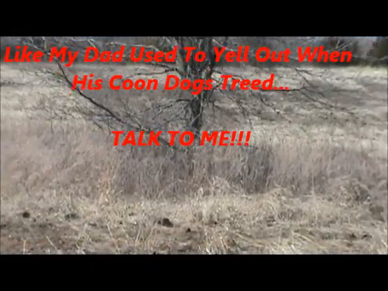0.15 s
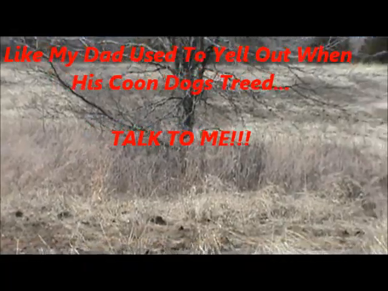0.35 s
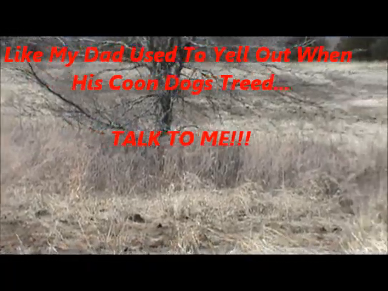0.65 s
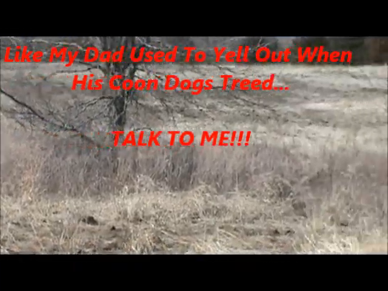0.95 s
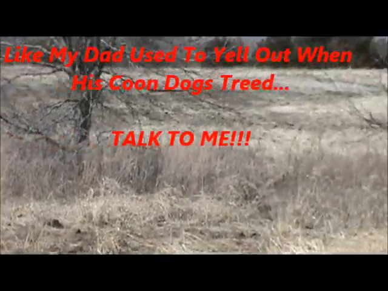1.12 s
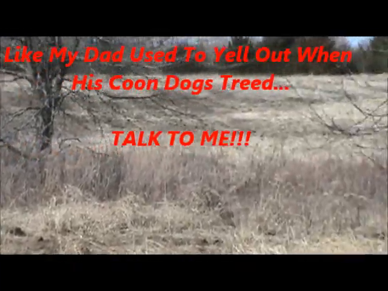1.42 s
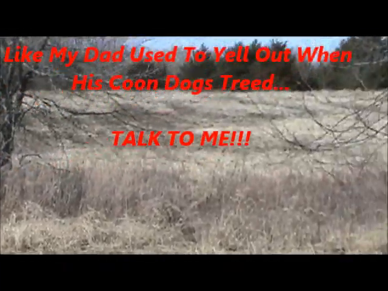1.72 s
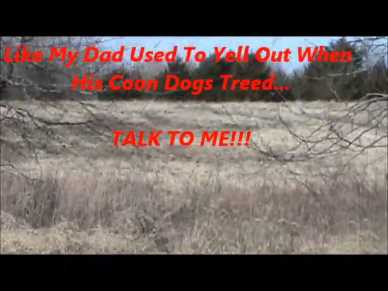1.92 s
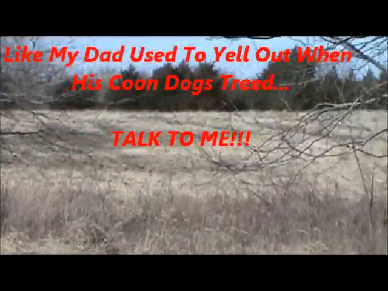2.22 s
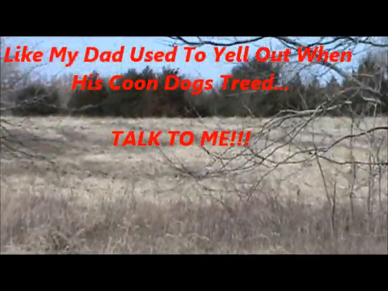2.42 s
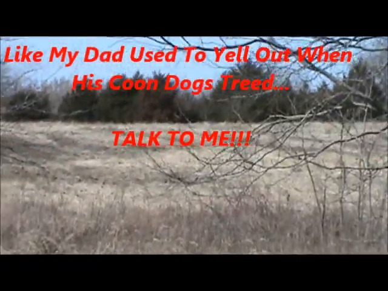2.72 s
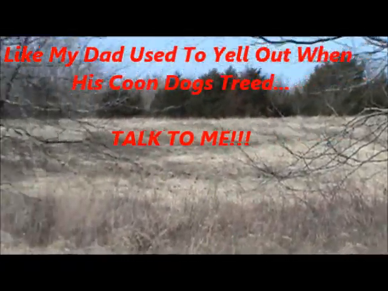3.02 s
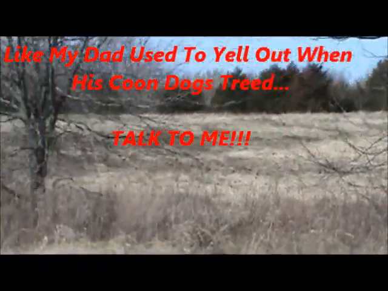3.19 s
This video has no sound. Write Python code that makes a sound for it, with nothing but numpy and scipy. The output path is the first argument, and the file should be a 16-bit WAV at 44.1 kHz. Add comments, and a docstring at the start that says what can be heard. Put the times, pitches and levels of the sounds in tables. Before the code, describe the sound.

Hunting hounds bay outdoors, slightly left. One is already mid-yelp at the start, then gives quick yelps breaking from low to high about every half second from 0.4, the last held from 2.9 to the end. A second bawls hoarsely at 2.0-2.4 and from 2.9. Brush and trees echo. Wind bumps mostly before 1.0; dry grass rustles and snaps, strongest near 1.3 and 2.8, over hiss and faint whine.

```python
"""A brushy field, where two hounds give tongue on a trail. One yelps in quick time, its voice breaking
between a low and a high register; the other joins with two long, hoarse bawls. Both are harmonics on an
unsteady pitch plus chopped noise. The brush scatters a short echo and a line of trees answers later.
Close by, dry grass rustles, crackles and snaps, and wind bumps the microphone: all coloured noise.
A steady hiss and a thin electronic whine lie beneath."""
import sys
import numpy as np
from scipy import signal
from scipy.fft import rfft, irfft
from scipy.io import wavfile

SR = 44100
rng = np.random.default_rng(int(sys.argv[2]) if len(sys.argv) > 2 else 0)


def output_pcm(signal):
    """Save a mono or channel-first signal as 16-bit PCM at the path in sys.argv[1].

    Samples are clipped to [-1, 1] before scaling.
    """
    pcm = np.clip(np.atleast_2d(signal).T, -1, 1) * 32767
    wavfile.write(sys.argv[1], SR, np.round(pcm).astype(np.int16))


N = 147735
T = np.arange(N) / SR


def from_db(db):
    """Decibels to amplitude."""
    return 10 ** (np.asarray(db) / 20)


def rms_one(x):
    """Scale to an rms of 1."""
    return x / np.sqrt(np.mean(x ** 2) + 1e-20)


def in_time(rows):
    """Columns of a curve at every sample; the first column is t/s."""
    s, *columns = np.transpose(rows)
    return [np.interp(T, s, c) for c in columns]


def at_hz(points, hz):
    """Gain of a spectrum at these frequencies, on a logarithmic frequency axis."""
    f, db = np.transpose(points)
    return from_db(np.interp(np.log(hz + 1e-6), np.log(f), db))


def colour(x, spectrum):
    """Shape a noise by a spectrum; rms 1, so only the relative levels of the spectrum count."""
    size = x.shape[-1]
    gains = at_hz(spectrum, np.fft.rfftfreq(size, 1 / SR))
    return rms_one(irfft(rfft(x) * gains, size))


def drift(corner_hz):
    """Random wander of rms 1: noise through two equal one-pole lowpasses."""
    r = np.exp(-2 * np.pi * corner_hz / SR)
    noise = rng.standard_normal(N + SR // 2)  # the extra half second lets the filter settle
    return rms_one(signal.lfilter([1], [1, -2 * r, r * r], noise)[-N:])


def gate(start, end):
    """The voice opens and closes on straight ramps centred on start and end."""
    attack_s, release_s = 0.006, 0.0095
    opening = np.clip((T - start) / attack_s + 0.5, 0, 1)
    closing = np.clip((end - T) / release_s + 0.5, 0, 1)
    return opening * closing


def spread(pair, alike):
    """Two unrelated signals as left and right of a given likeness (1 = mono)."""
    alike = np.clip(alike, 0, 1)
    middle = np.sqrt(1 + alike) * pair[0]
    side = np.sqrt(1 - alike) * pair[1] * np.array([[1], [-1]])
    return (middle + side) / np.sqrt(2)


def pan(x, db):
    """Raise the left and lower the right by db."""
    return x * from_db([[db], [-db]])


def voice(notes, throat, jitter, shimmer, fray, first_db, second_db, upper_db, halves=None):
    """Harmonics on an unsteady pitch, the overtones frayed; alternating strong and weak cycles add
    lines between them. The _db arguments trim the note levels; jitter, shimmer and fray are rms depths."""
    out = np.zeros(N)
    wobble, flutter = 1 + jitter * drift(184), 1 + shimmer * drift(47)
    frayed = np.array([1 + fray * drift(43.4) for _ in range(9)]) / np.sqrt(1 + fray ** 2)
    slip = fray * 0.39 * drift(230)  # phase wander of the upper harmonics, radians per harmonic number
    for i, note in enumerate(notes):
        opening = gate(note[0][0], note[-1][0])
        on = opening > 0
        hz, first, second, upper = [c[on] for c in in_time(note)]
        phase = 2 * np.pi * np.cumsum(hz * wobble[on]) / SR
        tone = from_db(first + first_db) * np.sin(phase)
        tone += from_db(second + second_db) * frayed[0, on] * np.sin(2 * phase)

        # Harmonics 3 to 10 share one level; the throat sets their balance
        k = np.arange(3, 11)[:, None]
        gains = at_hz(throat, k * hz)
        overtones = (gains * frayed[1:, on] * np.sin(k * (phase + slip[on]))).sum(0)
        tone += from_db(upper + upper_db) * overtones / np.sqrt((gains ** 2).sum(0))

        if halves:
            k = np.arange(6)[:, None] + 0.5  # lines halfway between the harmonics
            gains = at_hz(throat, k * hz) * from_db(-1.5 * k)
            lines = (gains * frayed[:len(k), on] * np.sin(k * phase)).sum(0)
            tone += from_db(in_time(halves[i])[1][on] - 3) * lines
        out[on] += np.sqrt(2) * tone * (opening * flutter)[on]
    return out


def rasp(spectrum, pulse_hz):
    """Turbulent air, chopped by irregular cycles, rings in the throat."""
    phase = 2 * np.pi * np.cumsum(pulse_hz * (1 + 0.0997 * drift(56.5))) / SR
    return colour(rng.standard_normal(N) * (1 + np.cos(phase)), spectrum)


def yelping_hound():
    """Quick yelps: notes in two registers, gliding catches of the voice and harsh patches."""
    # One list per note, levels before trim: t/s, f/Hz, fundamental/dB, second harmonic/dB, upper harmonics/dB
    low_notes = [
        [(0.377, 813, -65, -31, -48), (0.403, 745.5, -73.5, -21.5, -38), (0.411, 734, -23.5, -20, -35),
         (0.421, 722, -13, -23, -39), (0.43, 685, -19, -18, -22)],
        [(0.873, 636, -64, -34, -36.5), (0.897, 700.4, -64, -21.5, -36), (0.915, 693.4, -31, -16.5, -26),
         (0.929, 718, -6.5, -28, -37), (0.944, 725, -19, -21, -33)],
        [(1.263, 742, -23, -41, -27), (1.269, 759, -12, -39, -33), (1.281, 723, -9.5, -38, -28),
         (1.303, 736, -7, -24.5, -36), (1.313, 740, -17, -40, -30)],
        [(1.697, 756, -20, -44, -22), (1.709, 751, -14, -42, -40), (1.719, 744, -8, -41, -29),
         (1.731, 750.5, -13, -38, -23.5), (1.741, 729, -11, -29, -26), (1.753, 762, -6.5, -26.5, -29),
         (1.76, 725, -21, -28, -16)],
        [(2.23, 776, -22, -29, -35), (2.262, 770.4, -5.5, -38, -34), (2.284, 761, -17, -26, -44),
         (2.296, 695, -10, -36, -46), (2.316, 658.4, -18.5, -25, -42), (2.348, 677.0, -15, -33, -52),
         (2.364, 745, -15.5, -51, -41), (2.38, 687.4, -36, -20, -32)],
        [(2.613, 755, -46, -44, -85), (2.621, 735, -15.5, -26, -36), (2.641, 734.3, -13.5, -48.5, -28.5),
         (2.671, 711.4, -36, -39, -31), (2.693, 656.6, -15, -18.5, -29), (2.735, 596, -33, -26, -26),
         (2.761, 602, -25, -24, -22.5), (2.8, 593, -70, -19.5, -30)],
        [(2.88, 716.5, -27, -38, -44), (2.904, 723, -7.5, -25.5, -42), (2.936, 733, -10, -38, -30.5),
         (3.024, 731, -13, -24.5, -33), (3.07, 758, -14.5, -38, -44), (3.09, 582, -16, -26, -36),
         (3.118, 631, -14.5, -40, -31), (3.14, 650, -25, -20, -39)],
    ]
    high_notes = [
        [(0.0, 954, -15, -27, -33), (0.012, 959, -17, -23, -37), (0.028, 966, -21, -24, -35),
         (0.046, 822, -15, -31, -31), (0.054, 809, -10.5, -25, -38), (0.06, 880, -28, -36, -33),
         (0.068, 964, -23, -32, -50)],
        [(0.428, 926, -15, -25, -40), (0.434, 931, -22, -26.5, -31), (0.486, 931, -22.5, -17, -33.5),
         (0.502, 942, -23, -24.5, -39), (0.516, 946, -28, -19, -38), (0.528, 949.9, -23.5, -29, -29),
         (0.532, 944, -47, -8.5, -42)],
        [(0.942, 876, -8, -38, -34), (0.95, 885, -13.5, -26, -25), (0.974, 899.4, -16.5, -28, -22),
         (1.004, 898, -15.5, -26, -26), (1.034, 930, -18.5, -29, -26), (1.054, 974, -27, -23, -31),
         (1.06, 923, -51, -46, -19)],
        [(1.312, 883, -7.5, -40, -20), (1.32, 866, -9.5, -28, -25), (1.346, 893, -16.5, -26, -27.5),
         (1.376, 882, -11.5, -22.5, -24.5), (1.388, 858.5, -12.5, -38, -28), (1.398, 836, -0.5, -40, -35),
         (1.41, 914, -29, -40, -19)],
        [(1.758, 903.9, -21, -13.5, -17), (1.77, 927, -16.5, -19, -29), (1.784, 886, -18, -37, -19),
         (1.792, 886, -11, -34, -20.5), (1.808, 902, -22, -22, -21), (1.818, 882, -11.5, -51, -31),
         (1.832, 840, -19, -27, -15)],
        [(2.385, 1195, -12, -25, -45), (2.409, 1202, -20.5, -22, -61), (2.423, 1295, -14, -26, -48),
         (2.433, 1226, -7.5, -32, -52), (2.451, 1295, -17, -17, -54), (2.469, 1285, -21, -27, -79),
         (2.482, 1330, -43, -51, -49)],
        [(3.085, 848, -19, -26, -23), (3.133, 891.5, -23, -20.5, -31), (3.199, 865.1, -29, -24, -26),
         (3.209, 858, -34, -48, -35), (3.273, 845, -23.5, -19, -30), (3.331, 875, -19, -39.5, -33),
         (3.35, 892, -18, -17, -34)],
    ]
    # Short glides as a yelp opens or closes: start t/s, length/s, first f/Hz, last f/Hz, level before trim/dB
    voice_catches = [(0.054,0.029,1520,1307,-29),(1.051,0.0082,860,660,-24),(1.086,0.018,711,600,-24.5),(1.248,0.02,930,853,-15.5),(1.41,.015,785,772,-16),(1.427,0.0106,726,625,-13),(1.683,0.0173,1014,903,-22.5),(1.838,0.012,784,626,-12.5),(2.867,0.018,863,912,-17)]
    # Moments when the yelp turns harsh: start t/s, length/s, rasp level/dB
    harsh_moments = [(0.429,0.012,-31),(0.926,0.036,-24),(1.267,0.069,-39),(1.39,0.044,-24.5),(1.689,0.068,-22),(1.81,0.057,-25),(2.358,0.066,-28),(2.643,0.082,-17.5)]
    # Throat resonances, and the colour of the rasp: f/Hz, relative level/dB
    throat = [(1500,-9),(2200,9),(2800,10),(3100,4.5),(3500,-35),(4200,-13),(4900,-9),(5600,-37),(6400,-14),(8000,-39),(11000,-60)]
    rasp_colour = [(250,-26.5),(450,-14),(600,-5),(740,8.5),(1000,-14.5),(1350,-8.5),(1900,-12),(2500,-13.5),(3050,-27),(3500,-29.5),(4500,-43),(8000,-34)]

    low = voice(low_notes, throat, jitter=0.011, shimmer=0.12, fray=0.41,
                first_db=1.5, second_db=-1.5, upper_db=-1)
    high = voice(high_notes, throat, jitter=0.0076, shimmer=0.033, fray=0.23,
                 first_db=-2.5, second_db=-4, upper_db=-5.5)
    glides = [[(s, first_hz, db, db, db), (s + length, last_hz, db, db, db)]
              for s, length, first_hz, last_hz, db in voice_catches]
    catches = voice(glides, throat, jitter=0.052, shimmer=0.1, fray=1.0,
                    first_db=-1, second_db=-17, upper_db=-18.5)
    harsh = sum(from_db(db) * gate(s, s + length) for s, length, db in harsh_moments)
    return low + high + catches + harsh * rasp(rasp_colour, pulse_hz=350)


def bawling_hound():
    """A lower, held voice with half-pitch lines and much rasp."""
    # One list per bawl, levels before trim: t/s, f/Hz, fundamental/dB, second harmonic/dB, upper harmonics/dB
    bawls = [
        [(1.965,721.4,-25,-31,-38),(1.99,666.8,-30,-31,-32.5),(2.015,638.6,-11.5,-36,-46),(2.045,618.4,-11,-25,-31),(2.08,570.8,-19.5,-30,-19.5),(2.15,584.5,-16.5,-27,-30.5),(2.205,589,-21.5,-24,-27),(2.27,555.8,-16,-35,-45),(2.315,554.4,-13,-39,-43),(2.35,545,-20,-42,-28),(2.375,528,-30,-43,-26)],
        [(2.925,533.3,-25,-30,-32),(2.955,571.5,-14,-34,-27),(3.0,569.5,-23.5,-31.5,-37),(3.055,578.8,-17.5,-31.5,-39),(3.1,571.5,-26,-32.5,-32),(3.16,565,-17,-33,-31),(3.205,543.4,-31,-34,-25.5),(3.26,545.4,-35,-25.5,-27.5),(3.3,542.2,-31.5,-21.5,-22.5),(3.35,542.5,-35,-20.5,-29)],
    ]
    # Hoarseness of each bawl: t/s, rasp level/dB, half-pitch lines before trim/dB
    hoarseness = [
        [(1.96,-25,-36),(1.99,-16,-49),(2.06,-17,-26),(2.1,-23.5,-26),(2.21,-33,-24),(2.28,-20,-21),(2.37,-16.5,-31),(2.41,-39,-48)],
        [(2.92,-25,-27),(2.97,-19.5,-23.5),(3.07,-21,-28),(3.13,-23,-23.5),(3.21,-31,-26.5),(3.28,-30,-28),(3.35,-32,-29)],
    ]
    # Throat resonances, and the colour of the rasp: f/Hz, relative level/dB
    throat = [(280,-16),(450,32),(850,1.5),(1100,-11),(1400,-13),(1750,8),(1950,-12.5),(2200,9),(2500,-9),(2800,5),(3100,-8.5),(3500,-20),(4400,-18),(7000,-38)]
    rasp_colour = [(250,-22.5),(460,-13),(580,2),(800,6),(1000,-12.5),(1280,-6.5),(1550,-15),(1800,-8.5),(2300,-24),(3100,-21),(3500,-51),(4500,-57),(8000,-52)]

    tone = voice(bawls, throat, jitter=0.0056, shimmer=0.18, fray=0.33,
                 first_db=0.5, second_db=-1, upper_db=-4.5, halves=hoarseness)
    harsh = sum(from_db(in_time(h)[0]) * gate(h[0][0], h[-1][0]) for h in hoarseness)
    return tone + harsh * rasp(rasp_colour, pulse_hz=284.8)


def field(x):
    """Brush scatters a dying echo, and a line of trees sends back a later swell."""
    # Colour of the echo: f/Hz, relative level/dB
    echo_colour = [(300,-19),(700,-8),(1000,-7),(1500,5),(2000,-0.5),(3000,-3),(6000,-60)]
    echo_db, t60_s, delay_s = -6.5, 0.41, 0.01
    late_db, late_s, late_width_s = -20.5, 0.17, 0.027  # the trees, relative to the brush's start

    t = T[:SR]
    brush = from_db(-60 * t / t60_s) * (t > delay_s)
    trees = from_db(late_db) * np.exp(-((t - late_s) / late_width_s) ** 2)
    tail = spread(colour(rng.standard_normal((2, SR)), echo_colour), alike=0.77) * (brush + trees)
    response = np.abs(rfft(tail))[:, 600:3000]  # unit gain over 600-3000 Hz: 1 Hz bins
    tail = tail / np.sqrt(np.mean(response ** 2))
    return from_db(echo_db) * signal.fftconvolve(x[None], tail, axes=1)[:, :N]


def grass():
    """Soft swishing, fine crackle of random clicks and a few snapping stalks."""
    # Rise and fall of the rustling: t/s, level before layer trim/dB
    rustle = [(0.0, -48.5), (0.56, -46), (0.68, -48.5), (0.92, -49.5), (1.09, -44), (1.34, -40),
              (1.56, -44.5), (2.29, -43.5), (2.42, -44), (2.63, -43.5), (2.77, -39), (2.83, -38),
              (2.97, -46), (3.15, -46), (3.35, -49)]
    # Colour of the swish: f/Hz, relative level/dB
    swish_colour = [(200,9),(500,7),(1000,-1.5),(2000,1),(4000,0),(6000,-4),(8000,-1),(10000,-1),(12500,-10.5),(15500,-20)]
    # Stalks break: t/s, level before trim/dB
    stalk_snaps = [(0.958, -14.5), (1.1965, -24.5), (1.3364, -21.5), (1.5928, -23), (1.602, -20.5),
                   (1.8277, -25), (1.8755, -23.5), (2.5652, -28), (2.796, -19), (2.9225, -24)]
    crackle_colour = [(1000, -8), (4000, -4), (10000, -0.5), (15000, -11)]  # f/Hz, relative level/dB
    snap_colour = [(800, 5.5), (4000, -4), (11000, 5), (15000, -4)]
    crackles_per_s = 990  # at the mean rustle level; louder rustling is denser
    snap_s, snap_trim_db, snap_rise_s = 0.0056, -6, 0.0013

    level_db, = in_time(rustle)
    swish = spread(colour(rng.standard_normal((2, N)), swish_colour), alike=0.27) * from_db(1.7 * drift(29))

    born = rng.random((2, N)) < crackles_per_s * from_db(level_db - level_db.mean()) / SR
    strength = from_db(1.85 * np.minimum(rng.exponential(1, (2, N)), 3))
    clicks = born * rng.standard_normal((2, N)) * strength
    crackle = spread(colour(clicks, crackle_colour), alike=1.0)

    bursts = np.zeros(N)
    for s, db in stalk_snaps:
        rise = np.clip((T - s) / snap_rise_s + 0.5, 0, 1)
        bursts += from_db(db + snap_trim_db) * rise * np.exp(-np.abs(T - s) / snap_s)
    snaps = bursts * spread(colour(rng.standard_normal((2, N)), snap_colour), alike=0.76)
    return from_db(level_db + 4.5) * swish + from_db(level_db - 1.5) * crackle + snaps


def brushing():
    """Short gritty strokes of dry stems: noise of rough level under bell-shaped swells."""
    # Stems brush past: centre t/s, width/s, level/dB
    strokes = [(1.39,0.035,-37.5),(2.7,0.073,-38),(2.79,.02,-35.5),(2.93,0.04,-36)]
    stem_colour = [(1000, -19), (4200, 13), (7000, 11), (10000, -3), (15000, -23)]  # f/Hz, relative level/dB
    level = sum(from_db(db) * np.exp(-((T - s) / width) ** 2) for s, width, db in strokes)
    grit = rng.standard_normal((2, N)) * from_db(3.4 * drift(400))
    return level * spread(colour(grit, stem_colour), alike=1.0)


def wind():
    """Lumpy rumble as wind bumps the microphone ports."""
    # Rise and fall of the gusts: t/s, level before trim/dB
    gusts = [(0.0, -55), (0.08, -12), (0.13, -38.5), (0.21, -20.5), (0.23, -33.5), (0.33, -26.5),
             (0.37, -35), (0.53, -13.5), (0.57, -17), (0.61, -41), (0.64, -39.5), (0.7, -18), (0.81, -34.5),
             (0.89, -25), (0.91, -45), (0.93, -26), (0.99, -22.5), (1.1, -45.5), (1.49, -38), (1.88, -42),
             (2.08, -31), (2.12, -42.5), (2.72, -40), (2.8, -27), (2.84, -35), (2.99, -35.5), (3.02, -37.5),
             (3.11, -40), (3.23, -30), (3.27, -32.5), (3.31, -20.5), (3.35, -26)]
    # Colour of the rumble: f/Hz, relative level/dB
    rumble_colour = [(12, -40), (20, -3.5), (113, 0.5), (167, -5.5), (198, -10), (235, -10.5), (271, -16.5),
                     (321, -17.5), (450, -27.5), (580, -43), (990, -120), (3000,-85)]
    level_db, = in_time(gusts)
    rumble = spread(colour(rng.standard_normal((2, N)), rumble_colour), alike=0.11)
    return from_db(level_db + 1.0 * drift(43) + 0.5) * rumble


def hiss():
    """Steady recorder hiss, nearly mono."""
    # Colour of the hiss: f/Hz, relative level/dB
    hiss_colour = [(200,2),(1000,13),(3000,-10),(6000,-23),(9000,-3),(11000,0.5),(15500,-6)]
    return from_db(-42.5) * spread(colour(rng.standard_normal((2, N)), hiss_colour), alike=0.91)


def whine():
    """A thin, steady electronic whine: one very high sine."""
    whine_hz, peak_db = 15734, -62
    return from_db(peak_db) * np.sin(2 * np.pi * whine_hz * T)


def scene():
    """Hounds slightly left, their echo spread across both sides, grass slightly right, wind on both sides."""
    dogs = yelping_hound() + bawling_hound()
    close_by = grass() + brushing()
    return pan(dogs, 0.73) + field(dogs) + wind() + pan(close_by, -0.7)


def record(dry):
    """Faint hiss and whine are added, peaks are rounded, the top is cut."""
    cutoff_hz = 15850
    x = dry + hiss() + whine()
    x = x / (1 + x ** 8) ** (1 / 8)  # bends only near full scale
    lowpass = signal.ellip(12, 0.2, 80, cutoff_hz, fs=SR, output="sos")
    return signal.sosfilt(lowpass, x)


dry = scene()
out = record(dry)
output_pcm(out)
```